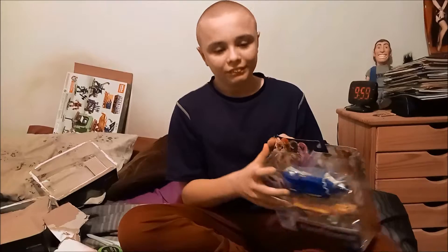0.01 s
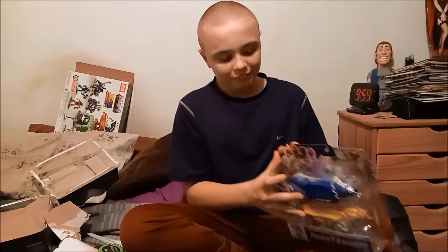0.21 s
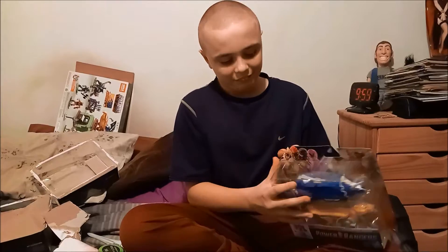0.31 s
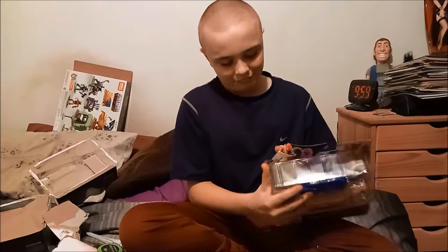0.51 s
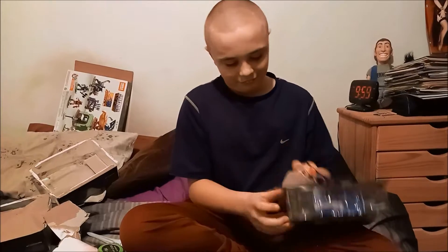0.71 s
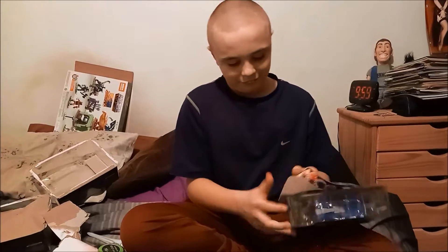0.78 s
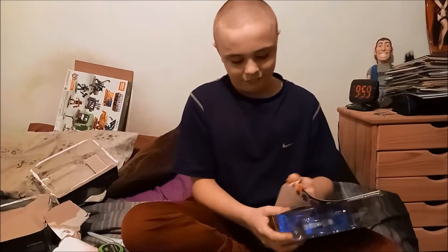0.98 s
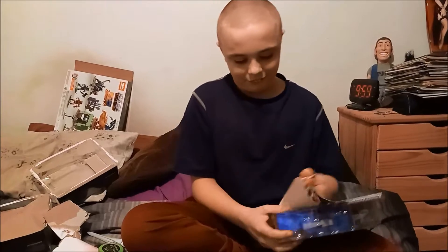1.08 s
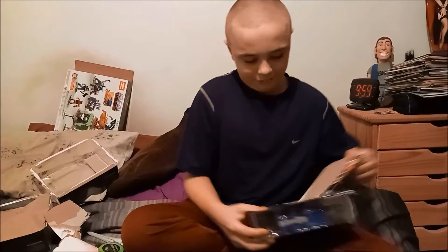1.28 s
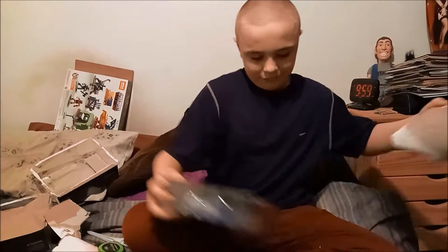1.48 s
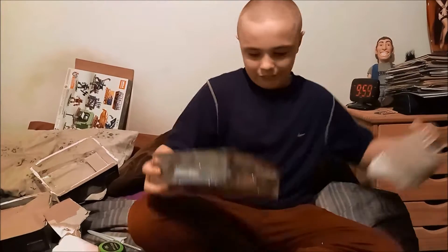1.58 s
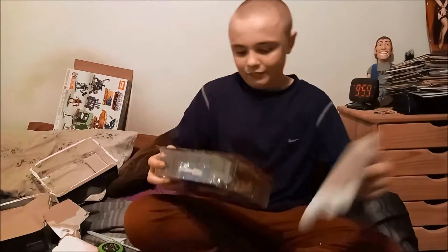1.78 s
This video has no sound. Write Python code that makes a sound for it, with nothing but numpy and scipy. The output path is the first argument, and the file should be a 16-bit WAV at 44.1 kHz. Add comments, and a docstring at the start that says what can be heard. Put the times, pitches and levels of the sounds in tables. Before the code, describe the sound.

A cardboard card scrapes out of stiff plastic packaging in a small room. A faint falling squeak opens, then a first rasping pull with sharp snaps runs from 0.25 to 0.55 seconds. Scattered crackles lead into a longer pull from 0.85 to 1.3 seconds. The hollow shell judders and knocks from about 1.1 to 1.5 seconds as the card comes free. A few light ticks follow until 1.7 seconds.

```python
"""Sliding a card out of plastic packaging

In a small furnished room, hands pull a cardboard card out of a stiff plastic blister.
The plastic squeaks under a finger and snaps as small patches of it buckle. The card rasps
along it in two long pulls, and the hollow shell judders and knocks as the card comes free.
A few light ticks follow. One microphone hears it all."""
import sys
import numpy as np
from scipy import signal
from scipy.io import wavfile

SR = 44100
rng = np.random.default_rng(int(sys.argv[2]) if len(sys.argv) > 2 else 0)


def output_pcm(signal):
    """Save a mono or channel-first signal as 16-bit PCM at the path in sys.argv[1].

    Samples are clipped to [-1, 1] before scaling.
    """
    pcm = np.clip(np.atleast_2d(signal).T, -1, 1) * 32767
    wavfile.write(sys.argv[1], SR, np.round(pcm).astype(np.int16))


N = 79380

# The tone of the steady background. Each row: frequency in Hz, gain in dB.
BACKGROUND_TONE = [(25, 1), (100, 14.5), (450, 1), (1000, 4.5), (3000, -5.5), (7000, -19.5),
                   (15000, -34)]
# How long the room echoes. Each row: frequency in Hz, seconds to fade by 60 dB.
ROOM_FADE = [(120, 0.29), (500, 0.13), (1500, 0.18), (4000, 0.25), (7000, 0.22), (15000, 0.11)]
# The path of the squeak. Each row: time in seconds, pitch in Hz, level in dB.
SQUEAK_PATH = [(0, 3530, -55), (.045, 3426, -59.5), (.08, 3010, -54), (.11, 2860, -67), (.14, 2520, -60)]
# The notes of the hollow shell. Each row: frequency in Hz, gain in dB, seconds to fade by 60 dB.
SHELL_NOTES = [(103.1, -9.5, 0.22), (156, -24, 0.0365), (248, -5.5, 0.056), (317.4, -3, 0.083),
               (422, -2, 0.023), (440, -0.5, 0.12), (521, 7.5, 0.023), (684, 6.5, 0.025), (880, -24, 0.12),
               (979, 12.5, 0.037), (1090, -12, 0.054), (1160, 2, 0.042)]
# How hard the shell shakes. Each row: time in seconds, level in dB.
JUDDER_LEVELS = [(0, -51.5), (.06, -72), (.14, -67), (.16, -44), (.2, -62), (.25, -33.5), (.29, -45.5),
                 (.39, -56), (.43, -56), (.46, -34), (.51, -69), (.54, -53), (.555, -32.5), (.578, -54),
                 (.605, -35.5), (.65, -62), (.72, -31), (.76, -81), (.81, -48.5), (.865, -35.5), (.92, -53),
                 (1.0, -50.5), (1.07, -45.5), (1.14, -26.5), (1.175, -36), (1.205, -25.5), (1.27, -31.5),
                 (1.298, -20), (1.333, -51), (1.362, -23), (1.385, -75), (1.44, -49.5), (1.5, -51),
                 (1.535, -49), (1.58, -68), (1.68, -71), (1.8, -80.5)]
# The tone of the slips that shake it. Each row: frequency in Hz, gain in dB.
JUDDER_TONE = [(50, -12.5), (110, 0), (200, 4.5), (420, 7), (700, -2), (1200, -6), (2000, -8.5),
               (4000, -18.5), (10000, -98)]
# Bumps on the shell. Each row: start in seconds, level in dB, treble cutoff in Hz, fade in seconds.
SHELL_KNOCKS = [(0.152, -42.5, 506, 0.011), (0.217, -47, 242, 0.0066), (0.454, -39, 610, 0.0095),
                (0.553, -35.5, 168, 0.027), (0.71, -40.5, 170, 0.011), (0.863, -43.5, 153, 0.03),
                (1.101, -27.5, 1440, 0.0085), (1.2255, -48, 1390, 0.0039), (1.291, -66, 375, 0.0049),
                (1.2993, -24.5, 1180, 0.0045), (1.3432, -23, 1110, 0.0027), (1.3487, -19.5, 600, 0.0033),
                (1.4604, -27, 1160, .002), (1.523, -42, 192, 0.03), (1.613, -64, 129, .012)]
# The notes of the thin plastic sheet. Each row: frequency in Hz, width in Hz, gain in dB.
SHEET_NOTES = [(1130, 84, -4), (1530, 30, -11), (1920, 57, -11), (2360, 270, -6.5), (2740, 76, -3),
               (3140, 45, -17), (4110, 43, -12), (5260, 110, -6.5)]
# How loudly the card rasps. Each row: time in seconds, level in dB.
RASP_LEVELS = [(0, -57.5), (.06, -61.5), (.2, -56), (.24, -44), (.26, -33.5), (.303, -36), (.318, -24),
               (.365, -31), (.41, -26), (.46, -24.5), (.51, -28.5), (.545, -37), (.58, -43.5), (.602, -34),
               (.628, -49), (.67, -45), (.705, -30), (.755, -41.5), (.8, -35), (.838, -33), (.858, -24),
               (.885, -26.5), (.96, -26), (1.01, -29.5), (1.06, -24.5), (1.1, -20.5), (1.135, -21),
               (1.185, -28), (1.24, -25), (1.315, -24.5), (1.336, -34), (1.38, -47.5), (1.45, -54.5),
               (1.49, -49.5), (1.55, -54), (1.64, -59), (1.71, -46.5), (1.75, -94), (1.8, -85.5)]
# The tone of the card's slips. Each row: frequency in Hz, gain in dB.
RASP_TONE = [(100, -29), (250, -4.5), (450, 1.5), (900, 1), (1500, 1), (2300, 0.5), (3200, 1.5),
             (4500, 1.5), (7000, 1.5), (11000, 9.5), (15500, 2.5)]
# A boost or cut to the rasp's low and middle range. Each row: time in seconds, gain in dB.
RASP_BODY_GAIN = [(0, 11), (.22, -12), (.33, -4), (.37, 0.5), (.44, 0), (.6, 3), (.78, -0.5), (.9, 1.5),
                  (1.1, 1), (1.28, 4), (1.42, 12.5), (1.6, -3.5)]
# The notes of a buckling patch. Each row: multiple of its pitch, gain in dB, seconds to fade by 60 dB.
PATCH_NOTES = [(1, -1, 0.016), (1.24, 1, .008), (1.46, 1.5, 0.0062), (2.0, -9, .006)]
# Snaps of the plastic. Each row: start in seconds, body level in dB, ring level in dB,
# treble level in dB, fade of the crack in seconds, pitch of the patch in Hz.
PLASTIC_SNAPS = [(.084, -75, -62, -66, 0.0018, 2960), (.097, -54, -76, -64, 0.0088, 1180),
                 (0.1435, -54, -53.5, -53, 0.0073, 1210), (.171, -49, -66, -76, 0.0017, 1250),
                 (.193, -78, -61, -74, 0.0022, 1870), (0.21, -43, -61, -66, .005, 1750),
                 (0.228, -47, -56, -54, 0.0048, 1190), (0.2453, -32, -27, -31, 0.0013, 1630),
                 (0.3062, -29, -31.5, -25.5, 0.0033, 1180), (0.385, -28, -29, -28, 0.0057, 1570),
                 (0.5461, -39, -37.5, -46, 0.0022, 1240), (.591, -50, -42, -43.5, 0.0055, 1100),
                 (0.6379, -38, -37, -28.5, 0.0027, 2540), (.6435, -74, -41.5, -32, 0.0023, 2310),
                 (.6835, -39.5, -38, -37, 0.0033, 990), (.7065, -32, -34.5, -43, 0.0064, 940),
                 (.778, -71, -53, -46, 0.0034, 2620), (.824, -55, -40.5, -40.5, 0.0034, 1220),
                 (0.8429, -35.5, -27.5, -35.5, 0.006, 2230), (.857, -57, -26, -29, 0.009, 3320),
                 (.865, -38, -57, -27, 0.00067, 2760), (1.3215, -62, -31, -28.5, 0.0053, 2570),
                 (1.4605, -43, -47.5, -43.5, 0.0015, 1170), (1.605, -81.5, -68, -53, 0.0055, 4240),
                 (1.624, -93.5, -97, -64.5, 0.0014, 4300), (1.65, -93, -70, -55.5, 0.0046, 5300),
                 (1.667, -85, -64, -57, 0.0037, 2280), (1.688, -61, -38.5, -37, 0.004, 1154)]
# The tone of the microphone. Each row: frequency in Hz, gain in dB.
MIC_TONE = [(25, -19), (55, -10.5), (100, -2), (200, -3), (4000, -3), (5500, 1), (6700, 7), (7400, 2.5),
            (8100, -9), (9000, -11), (10300, -8.5), (11500, -12), (13100, -16), (14700, -4), (15800, -2)]


def amp(db):
    """Turns decibels into a number to multiply by."""
    return 10 ** (np.asarray(db) / 20)


def evened(x):
    """Scales a sound to an average (rms) size of 1."""
    return x / np.sqrt(np.mean(x ** 2) + 1e-20)


def at_level(x, db):
    """Sets a hit's level as if all its energy fell within a hundredth of a second."""
    return amp(db) * x / np.sqrt(np.sum(x ** 2) / (.01 * SR) + 1e-20)


def read(points, hz):
    """Looks up a table by frequency, with octaves evenly spaced."""
    f, value = np.transpose(points)
    return np.interp(np.log(hz + 1), np.log(f + 1), value)


def curve(points, column=1):
    """Joins a table's points in time with straight lines, one value per sample."""
    columns = np.transpose(points)
    return np.interp(np.arange(N) / SR, columns[0], columns[column])


def add(mix, start_s, sound):
    """Mixes a sound in at its start time."""
    part = mix[max(round(start_s * SR), 0):][:len(sound)]
    part += sound[:len(part)]


def band(x, hz, kind, order=2):
    """Keeps the lows, the highs or a band between two frequencies."""
    return signal.sosfilt(signal.butter(order, hz, kind, fs=SR, output="sos"), x)


def below(x, hz):
    """Keeps the part of a sound under a frequency, without delaying it."""
    return signal.fftconvolve(x, signal.firwin(31, hz, fs=SR), "same")


def colour(x, tone, size=4096):
    """Shapes a sound with a tone table; the filter rings only after each hit, never before."""
    log_gain = np.log(amp(read(tone, abs(np.fft.fftfreq(size, 1 / SR)))))
    spectrum = np.exp(np.conj(signal.hilbert(log_gain)))
    taps = np.fft.ifft(spectrum).real
    return signal.fftconvolve(x, taps[:size // 2])[:len(x)]


def slips(per_s, spread_db=1):
    """Surfaces stick and let go, making random clicks of uneven size."""
    size = amp(spread_db * np.minimum(rng.exponential(1, N), 4))
    return size * rng.choice([-1., 1.], N) * (rng.random(N) < per_s / SR)


def burst(fade_s, rise_s=0.00061, size=6000):
    """Many tiny breaks of contact make a puff of noise that dies away."""
    t = np.arange(size) / SR
    return rng.choice([-1., 1.], size) * np.minimum(t / rise_s, 1) * np.exp(-t / fade_s)


def blow(fade_s, jolt):
    """One clean jolt, then a dying chatter of contacts."""
    push = burst(fade_s)
    push = push / np.linalg.norm(push)
    push[int(.0005 * SR)] += jolt
    return push


def background(level_db=-70.5):
    """A faint, steady, low rush of noise."""
    return amp(level_db) * evened(colour(rng.standard_normal(N), BACKGROUND_TONE))


def room(x, echo_db, echoes_per_s=4000, delay_s=0.0045, size=22050):
    """The room adds scattered echoes, each frequency fading at its own speed."""
    echoes = rng.choice([-1., 1.], size) * (rng.random(size) < echoes_per_s / SR)
    echoes *= np.arange(size) / SR > delay_s
    hz, t, spectrum = signal.stft(echoes, SR, nperseg=256)
    fade = amp(-60 * t / read(ROOM_FADE, hz)[:, None])
    tail = signal.istft(spectrum * fade, SR, nperseg=256)[1]
    return x + amp(echo_db) * signal.fftconvolve(x, tail / np.linalg.norm(tail))[:N]


def squeak():
    """A finger on the plastic makes a thin, falling squeak."""
    t = np.arange(N) / SR
    wobble = evened(band(rng.standard_normal(N), 666.7, "low"))
    pitch_hz = curve(SQUEAK_PATH) * (1 + 0.0093 * wobble)
    phase = 2 * np.pi * np.cumsum(pitch_hz) / SR
    octave = amp(-7 - 170 * t) * np.sin(2 * phase)  # fades by 170 dB a second
    fade_out = np.clip((SQUEAK_PATH[-1][0] - t) / 0.0081, 0, 1)
    return fade_out * amp(curve(SQUEAK_PATH, column=2)) * (np.sin(phase) + octave)


def shell(push, ring_db=5.5):
    """The hollow shell passes a push on and rings with its own notes."""
    t = np.arange(SR // 4) / SR
    ring = sum(amp(db - 60 * t / fade_s) * np.cos(2 * np.pi * hz * t) for hz, db, fade_s in SHELL_NOTES)
    ring = ring / np.sqrt(np.sum(ring ** 2) * SR / 2000)
    return push + amp(ring_db) * signal.fftconvolve(push, ring)[:len(push)]


def judder():
    """The dragging card shakes the whole shell with slower, heavier slips."""
    shake = shell(colour(slips(per_s=500), JUDDER_TONE))
    return evened(shake) * amp(curve(JUDDER_LEVELS))


def knocks():
    """Card and hand bump the hollow shell."""
    out = np.zeros(N)
    for start_s, db, top_hz, fade_s in SHELL_KNOCKS:
        push = band(blow(fade_s, jolt=0.92), top_hz, "low", order=5)
        push = band(push, 81 + 0.041 * top_hz, "high")  # harder knocks carry less bass
        add(out, start_s, at_level(shell(push), db))
    return out


def sheet(x):
    """The thin plastic passes the slips on and rings; wider notes die sooner."""
    t = np.arange(SR // 25) / SR
    ring = np.zeros(len(t))
    for hz, width_hz, db in SHEET_NOTES:
        fade = np.exp(-np.pi * width_hz * t)
        ring += amp(db) * 2 * np.pi * width_hz / SR * fade * np.cos(2 * np.pi * hz * t)
    return x + signal.fftconvolve(x, ring)[:N]


def rasp(dull_under_db=-46.5):
    """The card's edge slides over the plastic in thousands of tiny slips, duller when light."""
    level_db = curve(RASP_LEVELS)
    scrape = evened(sheet(colour(slips(per_s=3900), RASP_TONE)))
    body, dull = below(scrape, hz=4700), below(scrape, hz=8300)
    treble, fizz = dull - body, scrape - dull
    fizz_gain = amp(0.44 * np.minimum(level_db - dull_under_db, 0))
    return (amp(curve(RASP_BODY_GAIN)) * body + treble + fizz_gain * fizz) * amp(level_db)


def patch(push, pitch_hz):
    """A small, stiff patch of plastic rings briefly when pushed."""
    t = np.arange(len(push)) / SR
    ring = sum(amp(db - 60 * t / fade_s) * np.sin(2 * np.pi * multiple * pitch_hz * t)
               for multiple, db, fade_s in PATCH_NOTES)
    return signal.fftconvolve(push, ring)[:len(push)]


def snaps(jolt=0.82, body_hz=(278, 864), crack_hz=(1190, 3330)):
    """A patch buckles: a bright crack, a short ring and a little of the shell's hollow body."""
    out = np.zeros(N)
    for start_s, body_db, ring_db, treble_db, fade_s, pitch_hz in PLASTIC_SNAPS:
        ring = band(patch(blow(fade_s, jolt), pitch_hz), pitch_hz / 2, "high")
        body = shell(band(blow(2 * fade_s, jolt), body_hz, "band", order=3))
        crack = band(burst(fade_s), crack_hz, "band")
        # Weaker snaps are duller: their top drops an octave for every 10 dB.
        top_hz = np.clip(15600 * 2 ** ((treble_db + 30) / 10), SR / 8, 0.45 * SR)
        treble = band(burst(fade_s), crack_hz[1], "high")
        treble = band(treble, top_hz, "low", order=3)
        for part, db in (body, body_db), (crack, ring_db - 12), (ring, ring_db), (treble, treble_db):
            add(out, start_s, at_level(part, db))
    return out


def scene():
    """All the handling sounds in the room, the same in both channels."""
    mix = room(snaps(), echo_db=-7.5)
    mix += room(rasp() + squeak(), echo_db=-11)
    mix += room(knocks() + judder(), echo_db=-8)
    mix += background()
    return np.array([mix, mix])


def record(dry):
    """The microphone adds its own tone, and the treble above 15920 Hz is cut."""
    treble_cut = signal.firwin(511, 15920, window=("kaiser", 9), fs=SR)
    return np.array([signal.fftconvolve(colour(x, MIC_TONE), treble_cut, "same") for x in dry])


dry = scene()
out = record(dry)
output_pcm(out)
```